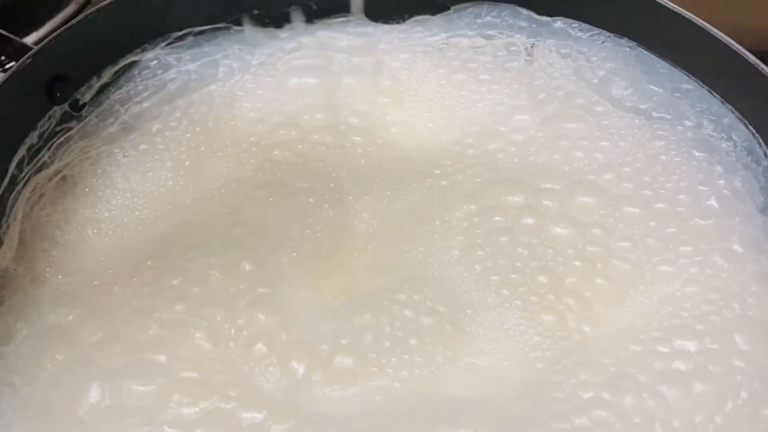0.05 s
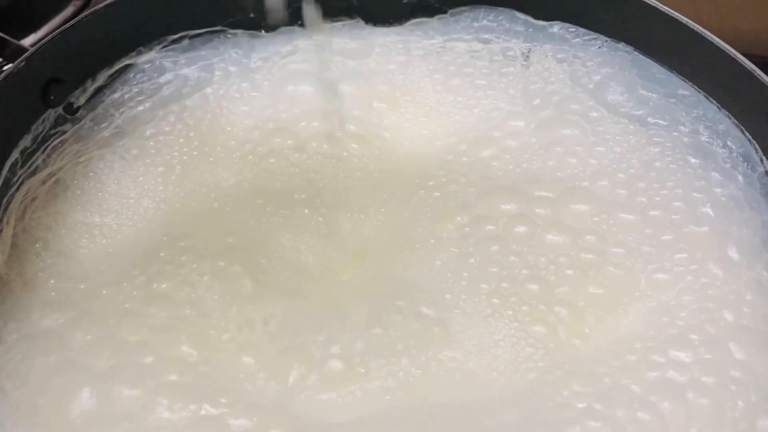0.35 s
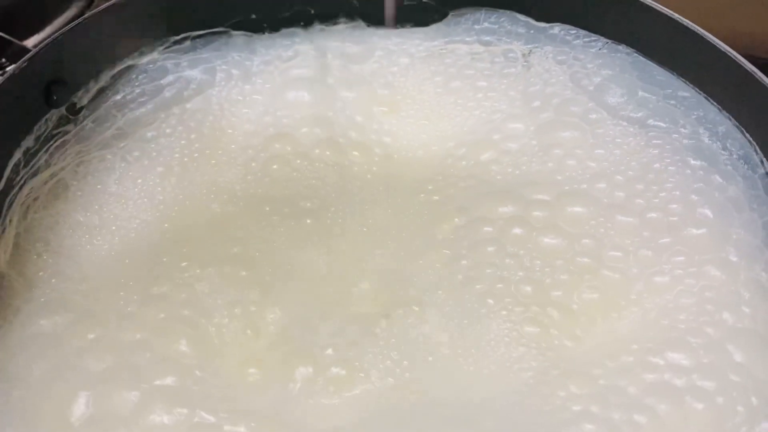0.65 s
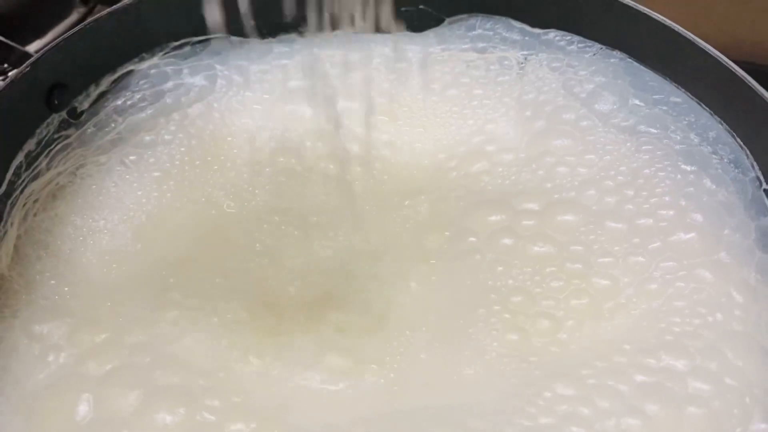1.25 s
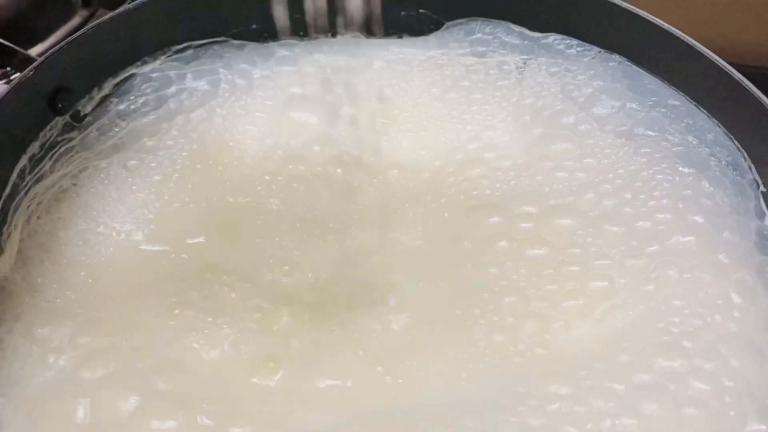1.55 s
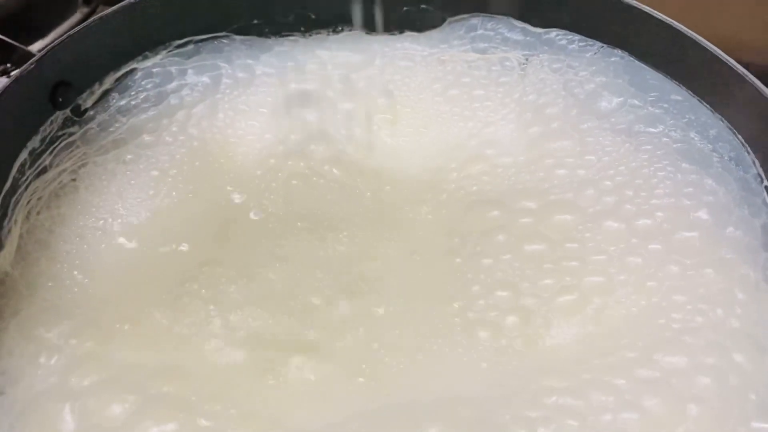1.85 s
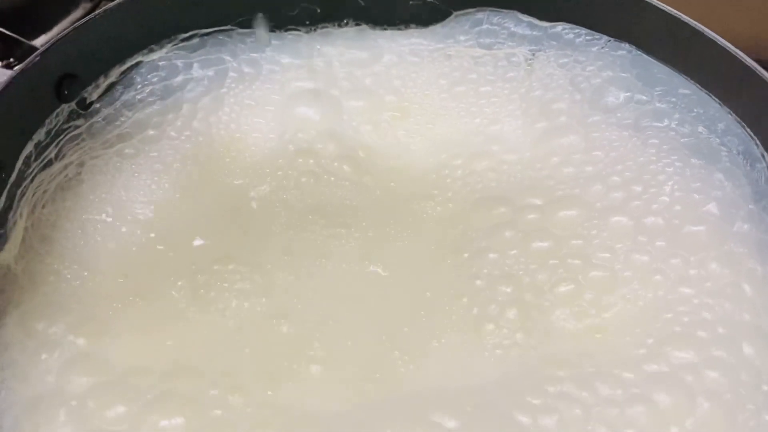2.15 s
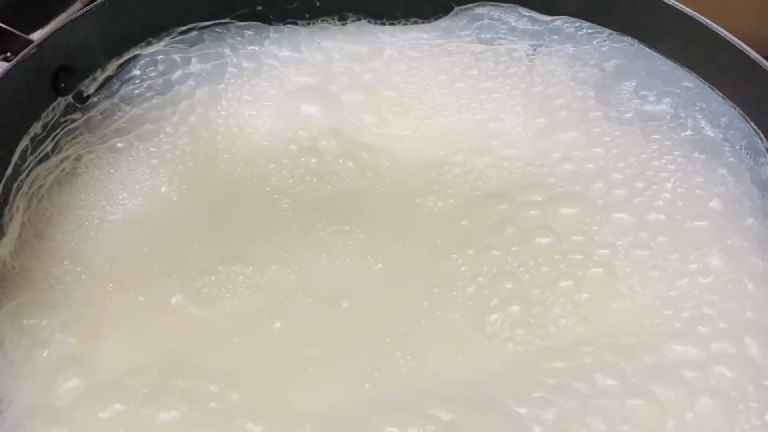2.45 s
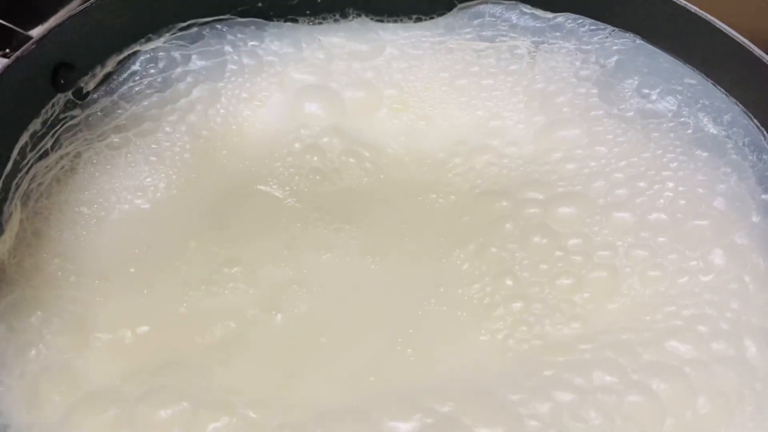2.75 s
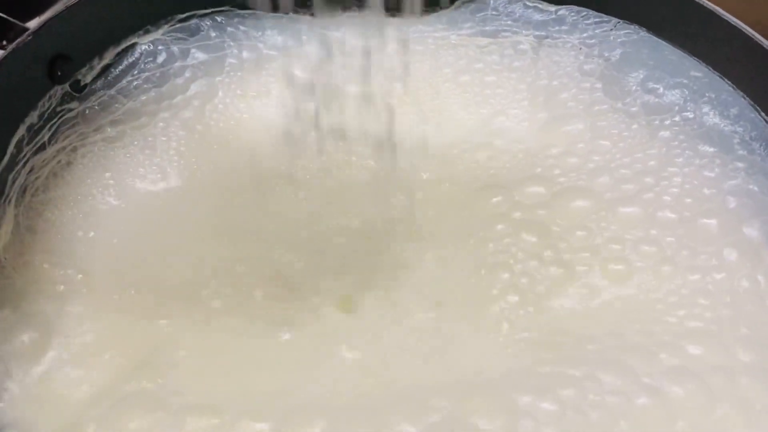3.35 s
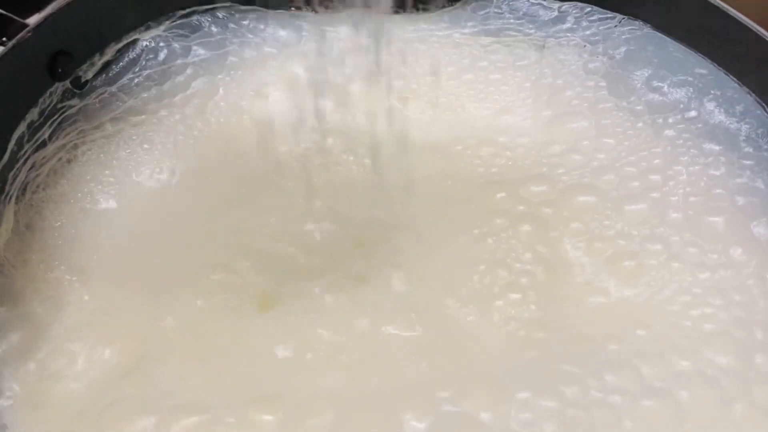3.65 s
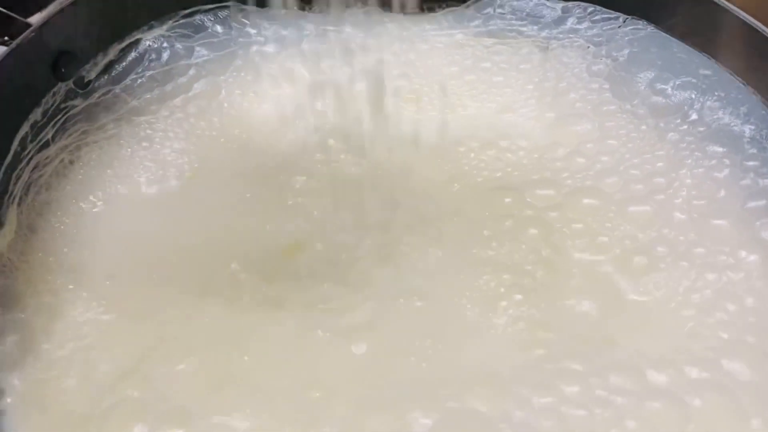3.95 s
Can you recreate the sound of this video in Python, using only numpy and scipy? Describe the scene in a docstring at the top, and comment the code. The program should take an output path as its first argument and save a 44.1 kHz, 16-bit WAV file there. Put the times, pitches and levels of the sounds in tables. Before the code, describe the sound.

Soft fizzing and popping of milk foaming in a pan, with a low room hum.

```python
"""Milk frothing in a pan

Milk froths on a stove while something is sprinkled into it in two waves. Each bursting foam bubble
is an impulse that excites a damped resonance: thousands merge into a sizzle, and larger ones stand out
as pops and plips, scattered by the pan and the kitchen. The milk seethes softly underneath, and a rush
swells between the waves. A wavering hum, a low rumble and a few thin steady tones fill the room."""
import sys
import numpy as np
from scipy import signal
from scipy.fft import rfft, irfft
from scipy.io import wavfile
from scipy.ndimage import uniform_filter1d

SR = 44100
rng = np.random.default_rng(int(sys.argv[2]) if len(sys.argv) > 2 else 0)


def waveform_to_disk(signal):
    """Save audio, clipped to [-1, 1], as 16-bit WAV at the path in sys.argv[1]."""
    frames = np.transpose(np.atleast_2d(signal))
    scaled = np.clip(frames, -1, 1) * 32767
    samples = np.round(scaled).astype(np.int16)
    wavfile.write(sys.argv[1], SR, samples)


N = 176400

# Envelope of the sizzle (time [s], relative level [dB])
SIZZLE_ENVELOPE = [(0, -48.5), (.06, -57.5), (.24, -59), (.6, -60), (.76, -61), (.83, -63.5), (.88, -56),
                   (1.0, -56), (1.3, -49.5), (1.55, -52.5), (1.72, -55.5), (1.85, -56), (1.96, -54),
                   (2.02, -64), (2.1, -59), (2.22, -67), (2.3, -61.5), (2.45, -67.5), (2.7, -68),
                   (2.84, -71.5), (2.9, -61.5), (3.04, -58), (3.11, -51.5), (3.36, -47), (3.62, -51.5),
                   (3.78, -51.5), (3.84, -53), (4, -48)]
# Spurts of crackle as patches of foam collapse (time [s], duration [s], level change [dB])
FOAM_COLLAPSES = [(0.147, 0.035, 4.5), (0.318, 0.031, 3.5), (0.386, 0.0405, 5), (0.723, 0.027, 3.5),
                  (1.143, 0.021, 8), (1.75, 0.063, 0), (1.93, 0.027, -1.5), (2.161, 0.014, 5),
                  (2.352, 0.046, 6.5), (2.557, .07, 4), (2.733, 0.026, 6), (3.133, 0.035, 4.5)]
# Filter that colours the bursting foam (frequency [Hz], gain [dB])
FOAM_SPECTRUM = [(700, -24.5), (2000, -1.5), (3000, -12), (4000, -9), (4500, 2), (5200, -15.5), (6000, -9),
                 (6600, -1.5), (7300, -3.5), (8000, 4.5), (8800, -5), (10000, 2.5), (11300, -2.5),
                 (13500, -4), (16000, -7)]
# Larger bubbles popping (time [s], relative level [dB], pitch [Hz])
POP_EVENTS = [(.0059, -28.5, 9300), (.0211, -37, 11000), (.0772, -30.5, 11000), (.0849, -30.5, 8500),
              (.1041, -34, 10400), (.1415, -46.5, 11700), (.167, -35, 7000), (.3197, -51, 6700),
              (.54, -36, 8900), (.5518, -37, 10200), (.5644, -47, 8060), (.6247, -37, 6960),
              (.6275, -40, 9500), (.637, -36.5, 10300), (.6544, -44.5, 6560), (.6994, -42.5, 6700),
              (.7692, -48, 7000), (.9152, -44, 11800), (1.0515, -34, 11200), (1.1523, -33, 10300),
              (1.213, -28.5, 10000), (1.3464, -34.5, 11100), (1.4844, -30, 10000), (1.5749, -30.5, 9800),
              (1.6498, -37.5, 11000), (1.666, -34.5, 8500), (1.7344, -39, 7900), (1.9041, -41, 10600),
              (1.929, -41, 6800), (1.986, -45, 7500), (2.0548, -42.5, 6050), (2.3005, -39, 10500),
              (2.339, -44, 11700), (2.3472, -50, 6400), (2.3594, -51, 6000), (2.5562, -44, 7100),
              (2.6145, -52, 4700), (2.8894, -47, 11300), (2.9272, -52, 11300), (2.963, -44, 8200),
              (3.0924, -35, 9000), (3.101, -38, 11000), (3.125, -31, 11000), (3.634, -36.5, 8440),
              (3.7243, -29, 9600), (3.7815, -36, 6500), (3.9578, -31, 11600)]
# Softer, lower plips of wet bubbles (time [s], relative level [dB], pitch [Hz])
PLIP_EVENTS = [(0.3202, -45, 2100), (0.7682, -40, 1670), (0.819, -34, 2190), (1.737, -41, 2190),
               (2.2443, -37, 2100), (2.2604, -42, 2070)]
# Later arrival of the foam's sound on the left (frequency [Hz], delay [ms])
LEFT_DELAY = [(1000, .05), (3000, .165), (6700, .15), (9200, .163), (11400, .175), (16000, .188)]
# Spectrum of the scattered sound (frequency [Hz], relative level [dB])
SCATTER_SPECTRUM = [(700, -13), (2000, -5), (3300, 3.5), (4500, 4), (6000, 5), (8000, -6), (12000, 8),
                    (16000, -19)]
# Envelope of the milk seething under the foam (time [s], relative level [dB])
SEETHE_ENVELOPE = [(0, -61.5), (.3, -62.5), (.8, -62), (1.15, -59.5), (1.4, -60), (1.62, -59), (2.0, -63.5),
                   (3.0, -61.5), (3.3, -56), (3.7, -56.5), (4, -57.5)]
# Filter that muffles the seething (frequency [Hz], gain [dB])
SEETHE_SPECTRUM = [(200, -11.5), (400, -0.5), (680, 1.5), (920, -4), (1300, -8), (1800, -19.5), (2100, -16),
                   (2600, -17.5), (4000, -13.5), (8000, -52.5)]
# Envelope of the mid-register rush (time [s], level [dB])
RUSH_ENVELOPE = [(0, -63), (.6, -62), (1.15, -63), (1.95, -60.5), (2.2, -57.5), (2.42, -56.5), (2.58, -54),
                 (2.75, -58), (2.95, -61.5), (3.15, -61.5), (4, -65)]
# Spectrum of the rush (frequency [Hz], relative level [dB])
RUSH_SPECTRUM = [(400, -3.5), (900, -0.5), (1300, 1.5), (2200, -2), (3500, -10.5), (6000, -18.5),
                 (12000, -27), (16000, -52)]
# Envelope of the wavering hum (time [s], relative level [dB])
HUM_ENVELOPE = [(0, -38.5), (.08, -33.5), (.12, -45), (.17, -36.5), (.42, -44), (.7, -39), (.76, -48.5),
                (1.11, -44.5), (1.3, -59), (1.39, -38), (1.45, -52), (1.56, -34), (1.6, -50), (1.74, -38),
                (1.84, -50.5), (1.94, -33), (2.05, -50), (2.12, -36), (2.19, -41.5), (2.38, -37),
                (2.53, -53.5), (2.65, -36.5), (2.71, -52), (2.8, -39.5), (2.86, -53), (3.14, -38.5),
                (3.19, -43), (3.31, -34.5), (3.41, -51), (3.48, -32.5), (3.61, -43.5), (3.69, -30.5),
                (3.77, -44.5), (3.89, -33), (3.95, -51.5), (4.0, -36.5)]
# Envelope of the boom an octave below the hum (time [s], relative level [dB])
BOOM_ENVELOPE = [(0, -55), (.6, -44.5), (.95, -52.5), (1.25, -49.5), (2.0, -44), (2.6, -45), (3.0, -44),
                 (3.3, -41.5), (3.8, -50.5), (4, -42.5)]
# Envelope of the rumble (time [s], relative level [dB])
RUMBLE_ENVELOPE = [(0, -52), (.3, -48.5), (.38, -54), (.48, -46.5), (.65, -50), (.8, -50.5), (1.02, -50),
                   (1.09, -48.5), (1.2, -48), (1.62, -47.5), (1.88, -45.5), (1.98, -43), (2.06, -44),
                   (2.27, -47), (2.5, -47.5), (2.56, -48), (2.68, -48.5), (3.0, -51.5), (3.25, -52),
                   (4, -53)]
# Spectrum of the rumble's broad noise (frequency [Hz], relative level [dB])
RUMBLE_SPECTRUM = [(20, -74), (60, 2), (110, 2.5), (160, -5), (240, -10), (290, -7), (380, -19),
                   (600, -27.5), (1500, -75)]
# Resonances that the rumble excites (frequency [Hz], bandwidth [Hz], relative level [dB])
RUMBLE_RESONANCES = [(132.1, 18.3, -4.5), (185.4, 8.9, -7), (205.84, 10.2, -8), (226, 5, -16.5),
                     (272, 27, -13.5)]
# Thin steady tones (frequency [Hz], level [dB], left minus right [dB])
THIN_TONES = [(444.5, -73.5, 0), (493.6, -71.5, -4), (544, -79, -10), (2073, -77.5, 0), (3406, -85, 0)]
# Likeness of left and right in the diffuse field (frequency [Hz], correlation [-1 to 1])
DIFFUSE_CORRELATION = [(50, 1), (130, 0.64), (280, 0.92), (550, 0.37), (1000, 0.58), (2000, -0.45),
                       (5000, 0.17)]


def foam(pan_t60_s=.025, pan_db=-8.5, kitchen_t60_s=.058, kitchen_db=-6.5):
    """Direct sound arrives on the right first; reflections from pan wall and kitchen decay after it."""
    direct = sizzle() + pops() + plips()
    delay_s = at_bins(LEFT_DELAY) / 1000
    phase_lag = np.pi * np.arange(N + 1) * SR / N * delay_s
    left = irfft(rfft(direct, 2 * N) * np.exp(-1j * phase_lag))[:N]
    pan_power = from_db(2 * pan_db) * reverberant_power(direct, pan_t60_s)
    kitchen_power = from_db(2 * kitchen_db) * reverberant_power(direct, kitchen_t60_s)
    scattered = unit_rms(colour(rng.standard_normal((2, N)), SCATTER_SPECTRUM))
    return np.array([left, direct]) + np.sqrt(pan_power + kitchen_power) * muffle(scattered, froth_db())


def sizzle(bursts_per_s=4600, rate_exponent=.66, fizz_db=-13.5, flutter_db=1.2, gain_db=-1.5):
    """Shot noise of tiny bursting bubbles: denser, louder and brighter as the froth is stirred up."""
    db = froth_db()
    rate = bursts_per_s * from_db(rate_exponent * (db - db.mean()))
    bursts = shot_noise(rate, spread_db=4, low_hz=1646, high_hz=17430, q=9.6, count=48)
    fizz = from_db(fizz_db) * rng.standard_normal(N)  # the finest bubbles
    clumping = from_db(flutter_db * drift(per_s=30))
    froth = unit_rms(colour(bursts + fizz, FOAM_SPECTRUM)) * clumping
    return from_db(db + gain_db) * muffle(froth, db)


def froth_db():
    """Collapsing patches of foam superpose short Gaussian pulses on the sizzle's slow envelope."""
    t = np.arange(N) / SR
    spurts = sum(db * np.exp(-(2 * (t - s) / length) ** 2) for s, length, db in FOAM_COLLAPSES)
    return in_time(SIZZLE_ENVELOPE) + spurts


def muffle(x, db, quiet_db=-59.5, cutoff_hz=10000):
    """Quiet foam loses its treble: a crossfade to a zero-phase low-pass as the level falls."""
    bright = 1 / (1 + from_db(2 * (quiet_db - db)))
    low_pass = signal.butter(2, cutoff_hz, fs=SR, output="sos")
    forward = signal.sosfilt(low_pass, x)
    dull = signal.sosfilt(low_pass, forward[..., ::-1])[..., ::-1]
    return bright * x + (1 - bright) * dull


def pops(width_hz=3600, snap=.48, spatter_db=-18, spatter_t60_s=.007, low_cut_hz=4900, gain_db=5):
    """Impulse response of a larger bubble: a snap, a few damped cycles and a decaying spatter."""
    size = 1024
    track, click = np.zeros(N + size), signal.unit_impulse(size)
    decay = from_db(spatter_db - 60 * np.arange(size) / SR / spatter_t60_s)
    for s, db, hz in POP_EVENTS:
        ring = resonate(click, hz, width_hz)
        spatter = decay * rng.standard_normal(size)
        pop = ring / abs(ring).max() + snap * click + spatter
        start = int(s * SR)
        track[start:start + size] += from_db(db + gain_db) * pop
    return signal.sosfilt(signal.butter(2, low_cut_hz, "high", fs=SR, output="sos"), track[:N])


def plips(width_hz=1230, gain_db=1):
    """Wet bubbles resonate lower than the pops, and their narrower bandwidth makes them ring longer."""
    track = np.zeros(N)
    for s, db, hz in PLIP_EVENTS:
        ring = resonate(signal.unit_impulse(N, int(s * SR)), hz, width_hz)
        track += from_db(db + gain_db) * ring / abs(ring).max()
    return track


def seething(wash_db=.5):
    """Bubbles in the liquid resonate at random times, muffled, over a soft wash of noise."""
    wash = from_db(wash_db) * unit_rms(colour(diffuse_noise()[:, :N], SEETHE_SPECTRUM))
    rings = [shot_noise(per_s=420, spread_db=2.9, low_hz=569, high_hz=1750, q=17.6, count=18)
             for side in range(2)]
    bubbles = unit_rms(colour(np.array(rings), SEETHE_SPECTRUM))
    return balance(db=2.5) * from_db(in_time(SEETHE_ENVELOPE)) * (wash + bubbles)


def rush():
    """Slow amplitude modulation makes a broad band of noise swell once and sink."""
    return from_db(in_time(RUSH_ENVELOPE)) * unit_rms(colour(diffuse_noise()[:, :N], RUSH_SPECTRUM))


def hum(hum_db=-.2, band_db=-12, boom_db=-1.5, right_delay_s=.00016):
    """An amplitude-modulated tone and noise band waver above a boom about an octave lower."""
    noise = diffuse_noise()
    sine = tone(hz=97.2, wander_hz=2.21)
    band = from_db(band_db) * narrowband(noise, hz=94.5, width_hz=19.8)
    wavering = from_db(in_time(HUM_ENVELOPE) + hum_db) * (sine + band)
    boom = from_db(in_time(BOOM_ENVELOPE) + boom_db) * narrowband(noise, hz=49.9, width_hz=28.3)
    left, right = wavering + boom
    right = np.interp(np.arange(N) - right_delay_s * SR, np.arange(N), right)
    return balance(db=-4) * np.array([left, right])


def rumble(bed_db=.5, gain_db=3.5):
    """Resonances driven by random excitation stand out of a bed of low noise."""
    noise = diffuse_noise()
    modes = sum(from_db(db) * narrowband(noise, hz, width) for hz, width, db in RUMBLE_RESONANCES)
    bed = from_db(bed_db) * unit_rms(colour(diffuse_noise(), RUMBLE_SPECTRUM))
    return balance(db=.1) * from_db(in_time(RUMBLE_ENVELOPE) + gain_db) * steady(modes + bed)


def thin_tones(flicker_db=2):
    """Faint sinusoids sound throughout, with slight random modulation of level and pitch."""
    return sum(balance(side_db) * from_db(db + flicker_db * drift(per_s=12)) * tone(hz, wander_hz=3)
               for hz, db, side_db in THIN_TONES)


def shot_noise(per_s, spread_db, low_hz, high_hz, q, count):
    """A Poisson train of uneven impulses, each exciting one of a bank of resonators; unit rms."""
    sizes = from_db(spread_db * np.minimum(rng.exponential(1, N), 5)) * rng.choice([-1, 1], N)
    clicks = sizes * (rng.random(N) < per_s / SR) / np.sqrt(per_s)  # power independent of rate
    resonator = rng.integers(0, count, N)
    pitches = np.geomspace(low_hz, high_hz, count)
    return unit_rms(sum(resonate(clicks * (resonator == k), hz, hz / q) for k, hz in enumerate(pitches)))


def resonate(x, hz, width_hz):
    """A damped two-pole resonator with unit gain at its peak."""
    r = np.exp(-np.pi * width_hz / SR)
    feedback = [1, -2 * r * np.cos(2 * np.pi * hz / SR), r * r]
    return signal.lfilter(np.array([1, 0, -1]) * (1 - r * r) / 2, feedback, x + 1e-18)


def reverberant_power(x, t60_s):
    """Scattered energy decays exponentially, by 60 dB in the reverberation time."""
    r = from_db(-2 * 60 / (t60_s * SR))
    return signal.lfilter([1 - r], [1, -r], x ** 2 + 1e-18)


def diffuse_noise():
    """Mid and side noise, 2N samples long, mix to a correlation that depends on frequency."""
    correlation = np.clip(at_bins(DIFFUSE_CORRELATION), -1, 1)
    mid, side = rfft(rng.standard_normal((2, 2 * N)))
    return irfft(np.sqrt(1 + correlation) * mid + np.sqrt(1 - correlation) * side * [[1], [-1]])


def narrowband(noise, hz, width_hz):
    """Steady-state response of two resonators in cascade, after N samples of settling; unit rms."""
    return unit_rms(resonate(resonate(noise, hz, width_hz), hz, width_hz)[:, N:])


def tone(hz, wander_hz):
    """A sinusoid whose phase is the integral of a wandering frequency; unit rms."""
    cycles = rng.random() + np.cumsum(hz + wander_hz * drift(per_s=5.968)) / SR
    return np.sqrt(2) * np.sin(2 * np.pi * cycles)


def drift(per_s):
    """Slow random modulation: straight lines between standard normal values."""
    knots = rng.standard_normal(400)
    return np.interp(np.arange(N) / SR * per_s, np.arange(len(knots)), knots)


def steady(x, window_s=.12):
    """Division by the running rms evens out the chance swells of a noise."""
    power = uniform_filter1d(np.mean(x ** 2, axis=0), int(window_s * SR))
    return x / np.sqrt(np.maximum(power, 1e-12))


def colour(x, spectrum):
    """Minimum-phase filter: folding the cepstrum makes the given spectrum causal."""
    cepstrum = irfft(np.log(from_db(at_bins(spectrum))))
    cepstrum[1:N] *= 2
    cepstrum[N + 1:] = 0
    return irfft(rfft(x, 2 * N) * np.exp(rfft(cepstrum)))[..., :N]


def at_bins(points):
    """Interpolation in log frequency onto the bins of a 2N-point transform."""
    hz, value = np.transpose(points)
    bin_hz = np.maximum(np.arange(N + 1) * SR / (2 * N), 1)
    return np.interp(np.log(bin_hz), np.log(hz), value)


def in_time(envelope):
    """Linear interpolation of an envelope at every sample."""
    return np.interp(np.arange(N) / SR, *np.transpose(envelope))


def balance(db):
    """Stereo gains for a level difference, left minus right."""
    return from_db(np.array([[.5], [-.5]]) * db)


def unit_rms(x):
    """Normalisation to unit mean power."""
    return x / np.sqrt(np.mean(x ** 2) + 1e-20)


def from_db(db):
    """Decibels to amplitude ratio."""
    return 10 ** (np.asarray(db) / 20)


def scene():
    """Superposition of the milk in the pan and the kitchen around it."""
    return foam() + seething() + rush() + rumble() + hum() + thin_tones()


def record(dry, low_cut_hz=38, high_cut_hz=16000):
    """Band limiting: steep filters remove the deepest bass and the highest treble."""
    dry = signal.sosfilt(signal.butter(6, low_cut_hz, "high", fs=SR, output="sos"), dry)
    return signal.sosfilt(signal.ellip(10, .2, 80, high_cut_hz, fs=SR, output="sos"), dry)


dry = scene()
out = record(dry)
waveform_to_disk(out)
```